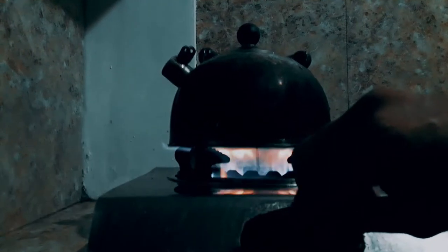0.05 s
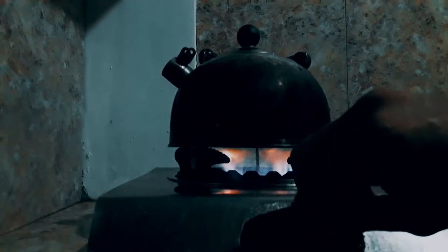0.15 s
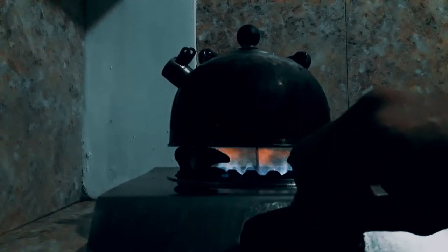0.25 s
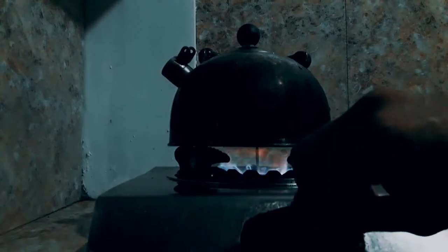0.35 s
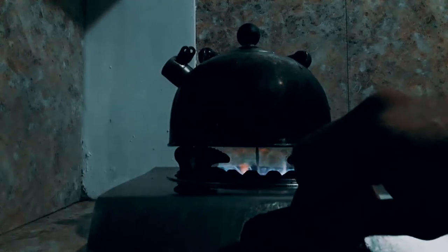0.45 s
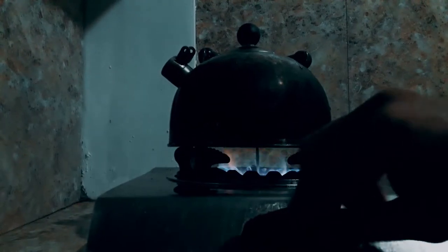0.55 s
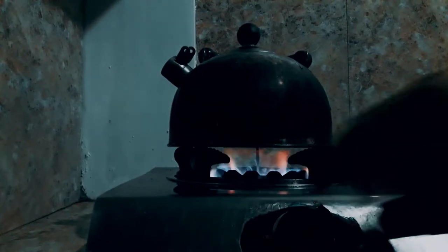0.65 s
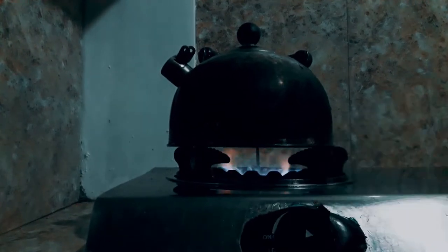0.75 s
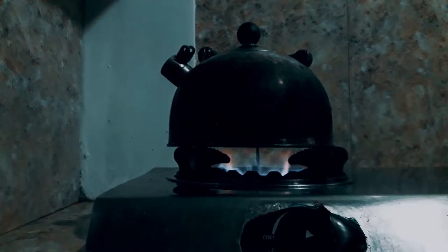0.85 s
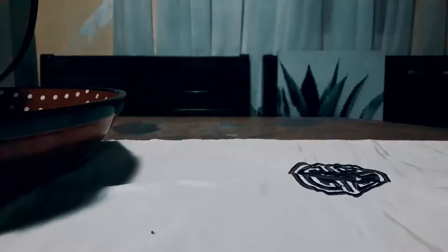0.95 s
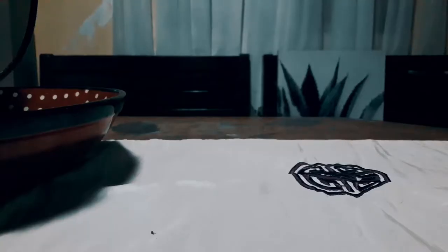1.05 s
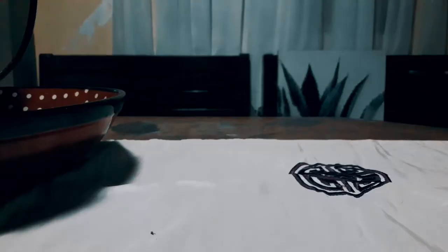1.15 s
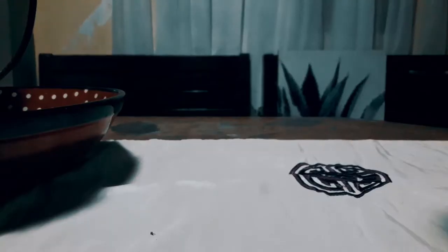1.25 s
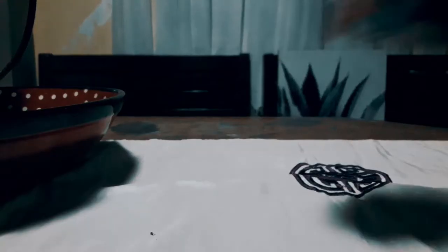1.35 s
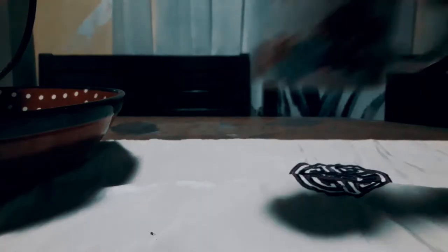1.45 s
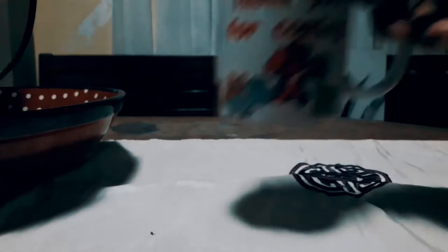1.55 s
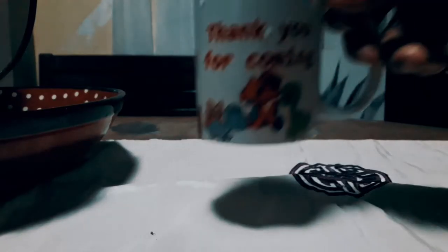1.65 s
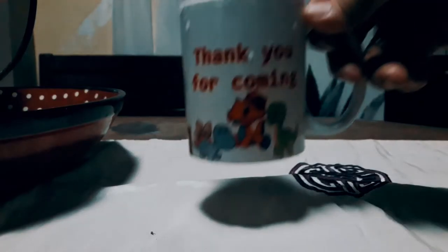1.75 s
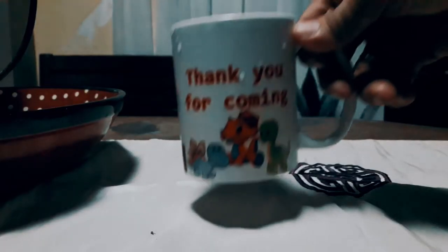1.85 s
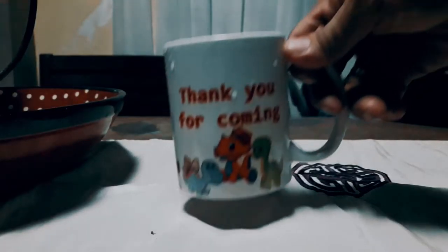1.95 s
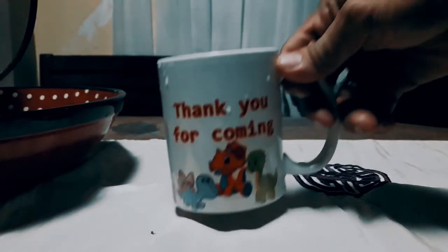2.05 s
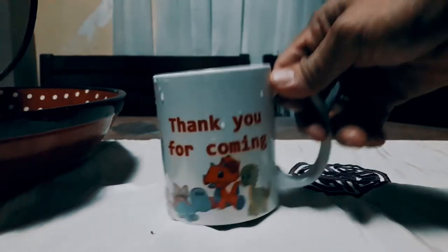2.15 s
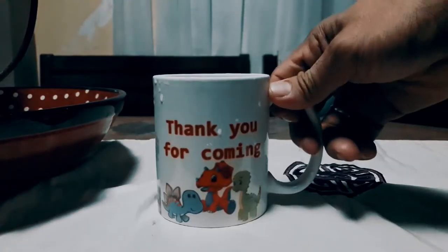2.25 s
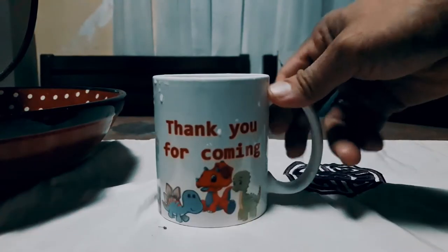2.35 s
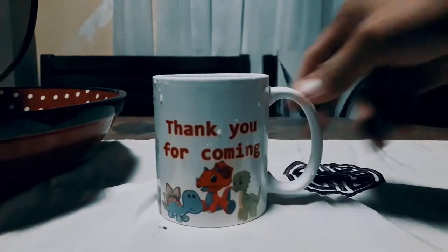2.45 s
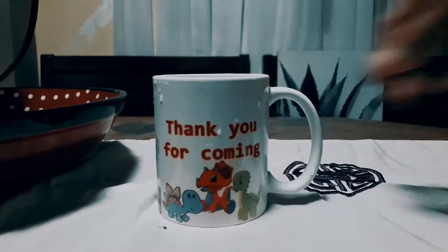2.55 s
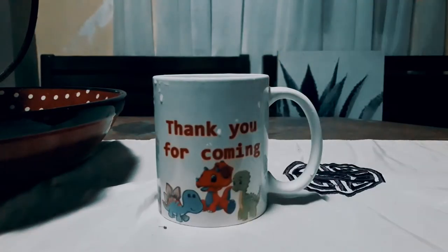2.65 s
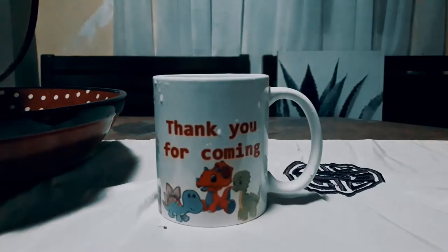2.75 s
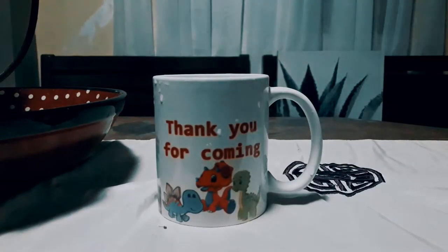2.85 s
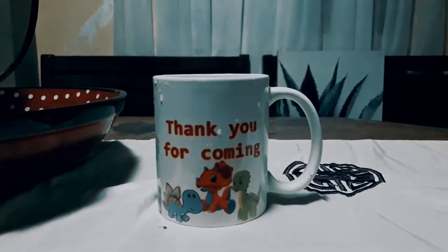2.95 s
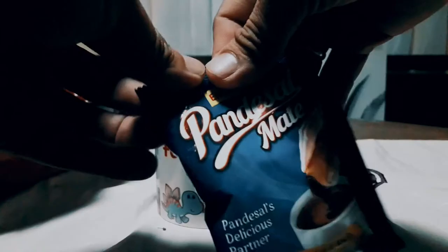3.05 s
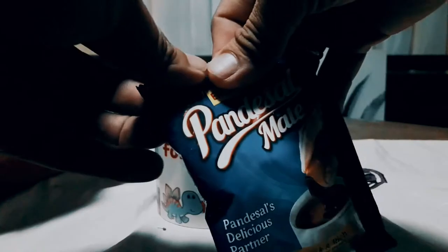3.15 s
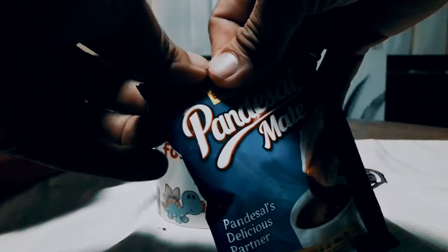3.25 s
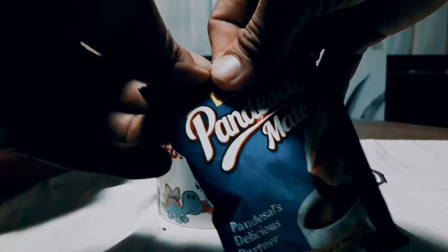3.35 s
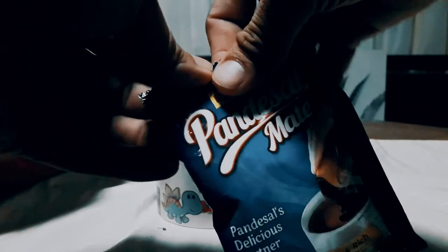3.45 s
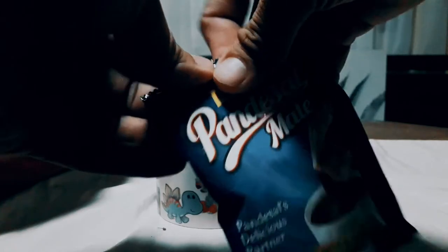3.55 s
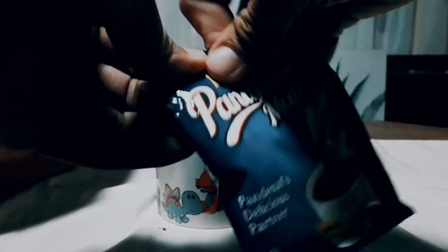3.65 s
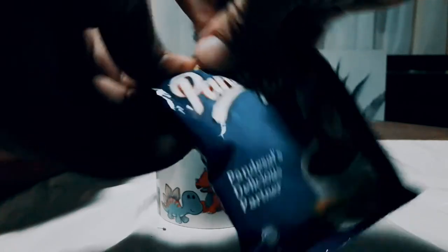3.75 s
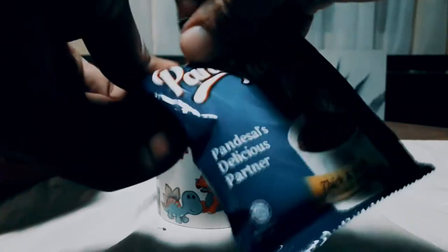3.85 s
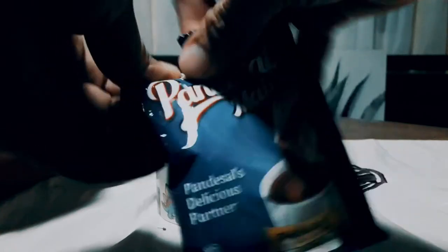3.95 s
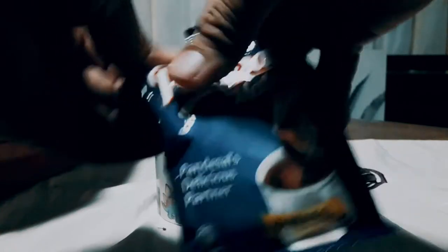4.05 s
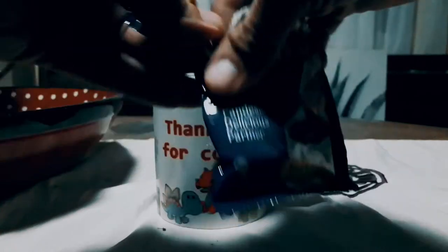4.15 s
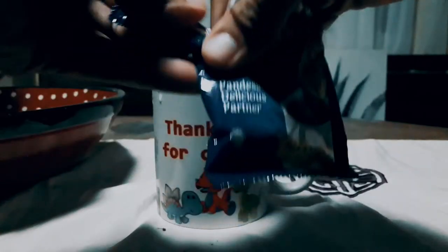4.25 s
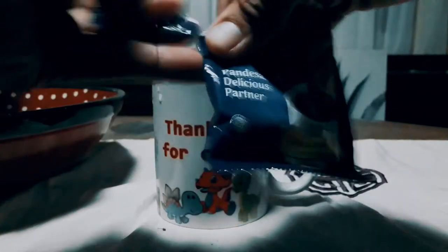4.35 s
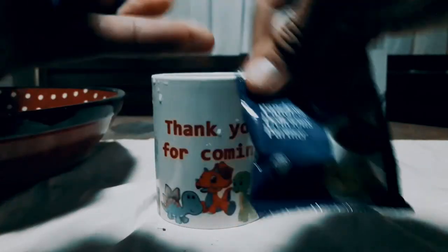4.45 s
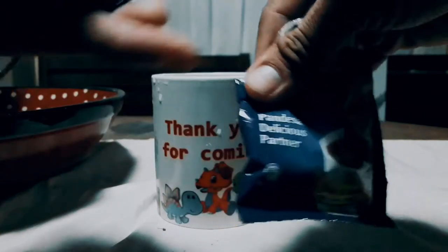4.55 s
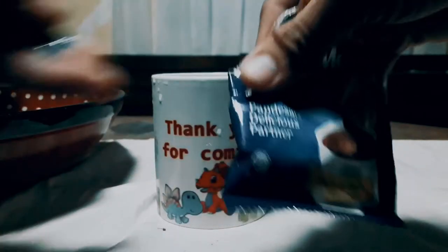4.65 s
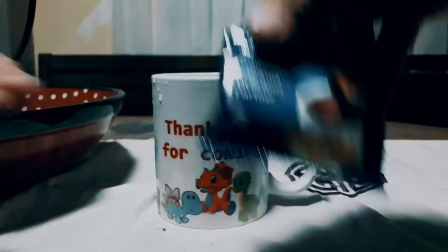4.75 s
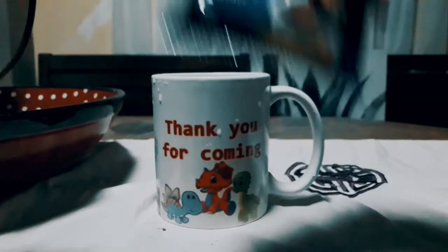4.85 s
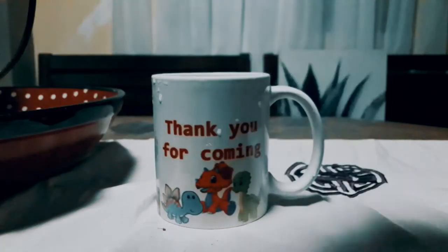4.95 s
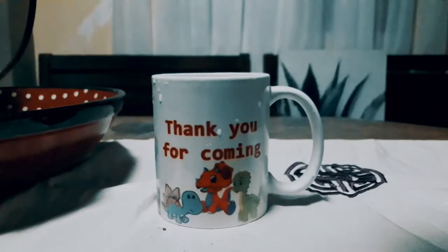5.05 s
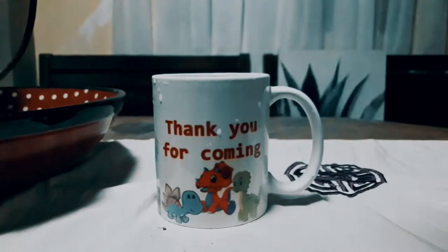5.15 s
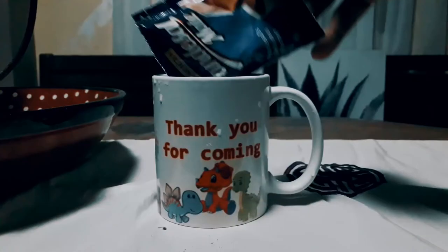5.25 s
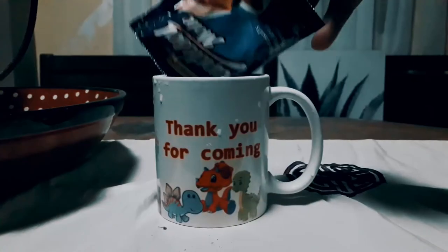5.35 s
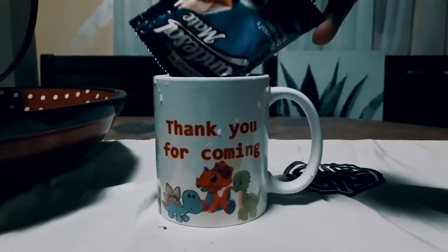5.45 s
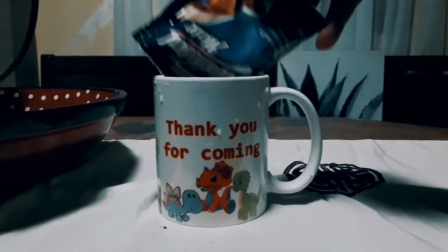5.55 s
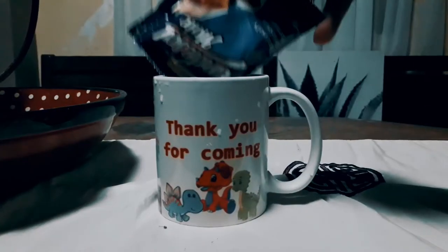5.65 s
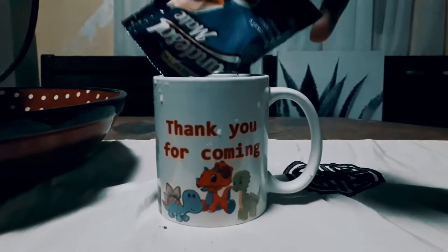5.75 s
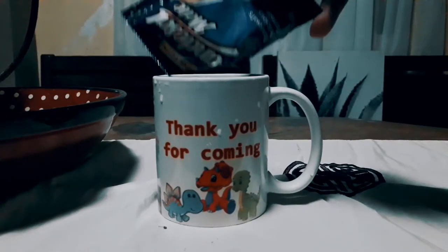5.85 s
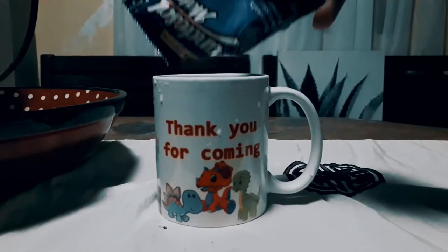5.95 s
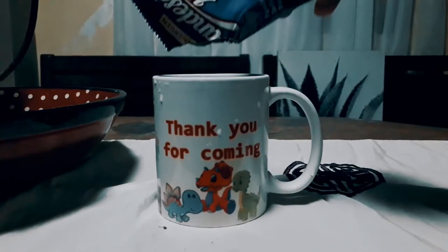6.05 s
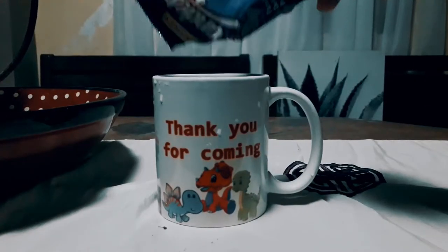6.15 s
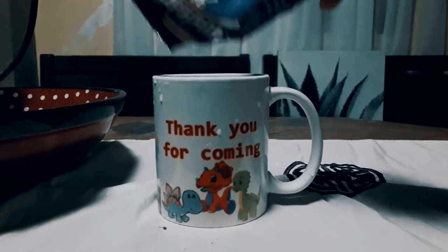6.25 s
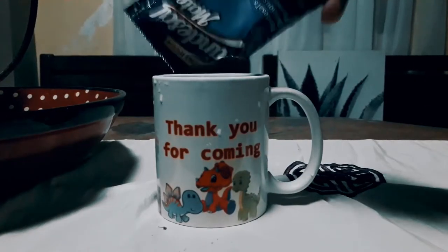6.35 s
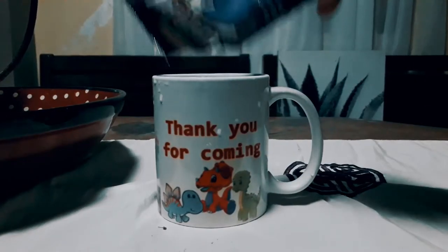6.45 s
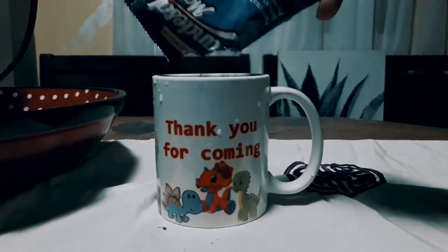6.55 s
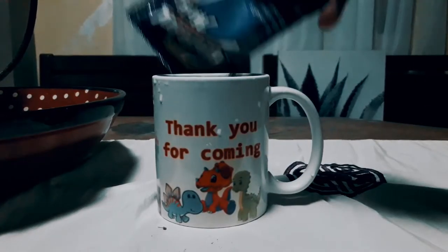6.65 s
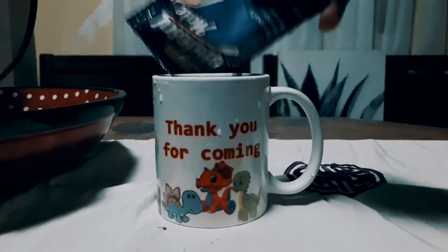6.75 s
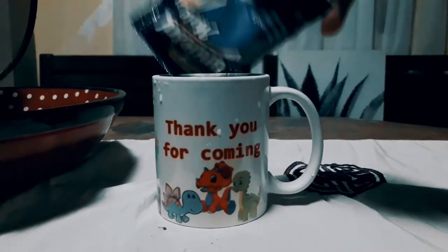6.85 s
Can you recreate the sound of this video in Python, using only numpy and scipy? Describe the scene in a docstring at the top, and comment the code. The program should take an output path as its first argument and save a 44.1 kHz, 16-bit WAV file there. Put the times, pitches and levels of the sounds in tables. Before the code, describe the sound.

Gas hiss and dull stove knocks, a hard cut, a ceramic mug landing on padded wood, then loud sharp sachet crackling fading to faint rustles.

```python
"""A small hard room, close to the microphone: a gas burner hisses while a hand knocks and works its knob.
After a cut, a ceramic mug lands on a cloth-covered wooden table, then a sachet is torn and tipped over it.
Coloured noise makes the jet, flame, cloth and room; decaying sine modes ring stove, table and mug.
The plastic film is sharp noise snaps with a facet ring each, over a crackle of random grains and ticks."""
import sys
import numpy as np
from scipy import signal
from scipy.fft import rfft, irfft, next_fast_len
from scipy.io import wavfile
from scipy.ndimage import uniform_filter1d

SR = 44100
rng = np.random.default_rng(int(sys.argv[2]) if len(sys.argv) > 2 else 0)


def generate_wav(signal):
    """Clip the signal to [-1, 1] and save it as 16-bit WAV at the path in sys.argv[1]."""
    frames = np.transpose(np.atleast_2d(signal))
    scaled = np.clip(frames, -1, 1) * 32767
    pcm = np.round(scaled).astype(np.int16)
    wavfile.write(sys.argv[1], SR, pcm)


N = 303849
TIME = np.arange(N) / SR

# Colour tables shape noise: freq_hz, gain_db. Mode tables hold ringing partials: freq_hz, level_db, t60_s.

# hiss of the gas jet, singing near one pitch: freq_hz, gain_db
JET_COLOUR = [(2800, -20), (4000, -5), (5250, 1.5), (5550, 13.5), (6150, -4.5), (7400, -1), (8300, -22),
              (9900, -17), (11000, -11), (12500, -15), (16000, -13)]
# low rumble of the flame: freq_hz, gain_db
FLAME_COLOUR = [(25, -22), (60, -5), (100, 1.5), (160, -11.5), (380, -22.5), (900, -31), (1300, -38),
                (3000, -40.5), (6000, -64)]
# the jet's thin overtone dies back as the gas is turned down: time_s, level_db
JET_OVERTONE_LEVEL = [(0, -55.5), (.2, -73), (.9, -71.5)]
OVERTONE_COLOUR = [(9000, -60), (10700, -22), (11020, -8), (11350, -28), (13000, -66)]
# the burner's soft falling whistle: time_s, pitch_hz, level_db
BURNER_WHISTLE = [(0, 910, -64), (.12, 872, -64), (.16, 795, -61), (.29, 782, -55.5), (.4, 769, -63),
                  (.53, 747, -94)]
# the hand knocks knob and stove: start_s, boom_db, knock_db
KNOB_KNOCKS = [(0.094, -46.5, -51), (.279, -53, -67), (0.327, -43, -57.5), (.563, -69, -44),
               (0.664, -42, -51), (.699, -40, -44), (.722, -45, -66), (.774, -43.5, -46)]
# ringing of the stove body: freq_hz, level_db, t60_s
STOVE_MODES = [(101.7, 2, 0.38), (129, 8.5, 0.049), (227.5, -2.5, 0.19), (273, -1, 0.27), (367.4, -15, 1)]
# noise of a knock on the stove: freq_hz, gain_db
STOVE_KNOCK_COLOUR = [(200, -19), (420, 1), (600, 4.5), (800, -6.5), (1000, -2.5), (1250, -23), (2500, -23),
                      (7000, -56), (12000, -50)]
SPIT_COLOUR = [(1200, -36), (2000, -19), (3000, -19), (3900, -2), (4900, -1.0), (6300, -9),
               (7500, -11.5), (8800, -34), (12300, -20), (16000, -35)]

# hum and air of the room: freq_hz, gain_db
ROOM_COLOUR = [(25, -28), (60, -17), (120, -1.5), (210, -3), (320, -16.5), (550, -24), (800, -22.5),
               (1200, -31), (2800, -35.5), (4300, -32), (7000, -38), (9000, -44.5), (16000, -37.5)]
# a faint tone hangs in the room: time_s, pitch_hz, level_db
ROOM_TONE = [(1.66, 814, -72), (1.78, 830, -64.5), (2.0, 830, -81)]
REVERB_COLOUR = [(200, 8.5), (900, -15), (2500, -25.5), (4500, 4.0), (7500, -0.5), (10000, -1.0), (16000, 5)]

# cloth brushed by sleeve, hand and the mug's foot: start_s, swish_db (lower part), hiss_db (upper part)
CLOTH_BRUSHES = [(1.207, -62, -56), (1.275, -56, -54), (1.838, -51, -58), (1.952, -56.5, -56),
                 (2.15, -47, -49), (2.2, -64.5, -65), (2.594, -60.5, -49), (2.7, -65, -51.5)]
# noise of the weave: freq_hz, gain_db
CLOTH_COLOUR = [(1000, -16), (3000, -11.5), (3900, -4.5), (4900, -4), (7400, -7.5), (8400, -29),
                (16000, -25)]
# small ticks on the cloth: start_s, peak_db
TICKS = [(1.208, -38.5), (1.955, -36), (2.599, -41)]
# the mug lands and rocks flat: start_s, level_db (over the blow and boom levels)
MUG_LANDING = [(2.1411, 0.5), (2.1590, -3.5), (2.1721, -8.5), (2.1810, -6.5), (2.2290, -3.5)]
# ringing of the table under the mug: freq_hz, level_db, t60_s
TABLE_MODES = [(146, -8, 1), (235.8, -0.5, 0.22), (281.6, 4, 0.36), (330, -0.5, 0.61), (394, 3, .3),
               (454, -6, .22), (496, -2, 0.64), (722, 2.5, 0.31), (779, -14, 0.19), (856, -1.5, .28),
               (984, -9, 0.56), (1000, -14, 0.34), (1290, -18.5, .28)]
# noise of the mug's blow and boom: freq_hz, gain_db
THUD_COLOUR = [(30, -33), (70, -15), (150, 1.5), (400, 2.5), (600, -5), (830, -4.5), (1100, -16),
               (1450, -27), (2200, -27), (4000, -43), (8000, -66)]
CUSHION_COLOUR = [(1200, -0.5), (2400, -19.5), (5000, -18.5)]
# air resonances of the empty mug: freq_hz, level_db, t60_s
MUG_AIR_MODES = [(849, 2.5, 0.024), (1920, -27.5, 0.1), (3260, -7, 0.055), (3686, 9, 0.0069)]

# the two sachet shots, tearing and pouring: start_s, end_s
SACHET_SHOTS = [(2.892, 4.1192), (4.1192, 7)]
# finger movements on the sachet: start_s, length_s, strength_db, body_db and top_db (re strength),
# creasing_share (0-1)
FINGER_RUSTLES = [(2.862, 0.16, -40.5, -14.5, -9.5, 0.03), (3.032, 0.089, -45, -12, -19, 0.33),
                  (3.307, .17, -47.5, -13, -10.5, 0.27), (3.522, 0.15, -35.5, -2, -17, 1),
                  (3.758, 0.047, -32, -3.5, -19.5, 1), (3.927, 0.094, -42.5, -1, -10, 0.73),
                  (4.13, 0.17, -52, -25, 1, 1), (4.334, 0.051, -41.5, -9, -6.5, 0.76),
                  (4.579, 0.061, -51, -16.5, -4.5, 1), (4.701, 0.065, -35.5, -22, -8.5, 0.8),
                  (4.8, 0.13, -43.5, -14, -5, 0.73), (4.948, 0.13, -42.5, -33, -7.5, 0.75),
                  (5.108, 0.04, -35, -17, -11, 0.53), (5.178, 0.035, -52.5, 1.5, -9, 0.1),
                  (5.346, 0.16, -55, -23.5, -11, 0.03), (5.507, 0.035, -46.5, -14, -10, 0.4),
                  (5.583, 0.095, -57.5, -2, -20, 0.57), (6.359, 0.13, -67.5, -14.5, -9.5, 0.13),
                  (6.495, 0.036, -53, -11.5, -9, 0.41), (6.581, 0.037, -55, -9, -8.5, 0.2),
                  (6.69, 0.14, -60, -11, -3.5, 0.34), (6.831, 0.058, -49.5, -13, -9.5, 0.54)]
# single snaps of the buckling film: start_s, level_db, ring_hz, body_db (re level)
SINGLE_SNAPS = [(3.1169, -37, 6300, -14), (3.1369, -37, 4300, -0.5), (3.469, -39.5, 4000, 2.5),
                (3.509, -40.5, 4460, 5.5), (3.6703, -20, 6400, -17.5), (3.6913, -15, 4900, -21),
                (3.7134, -9, 4710, -8.5), (3.7292, -16, 5200, -12), (3.759, -12, 4450, -25.5),
                (3.7766, -24, 5300, -29), (3.7967, -23.5, 4900, -24), (3.805, -21.5, 4080, -10.5),
                (3.83, -29.5, 3800, -28), (3.9238, -18, 4100, -21), (3.9505, -29.5, 4100, -29.5),
                (3.9672, -21.5, 5440, -21), (4.0037, -20, 6150, -16.5), (4.117, -17.5, 4620, 1),
                (4.1466, -25, 5570, -20), (4.278, -23, 4170, -36), (4.3028, -26.5, 5430, -12.5),
                (4.3727, -21, 6100, -13), (4.5843, -37.5, 6260, -30), (4.6788, -34, 7400, -32),
                (4.693, -29, 5260, -40.5), (4.7473, -26, 5540, -27), (4.795, -25, 3150, -10.5),
                (4.8288, -30, 4750, -6.5), (4.861, -19, 4200, -21.5), (4.9181, -20.5, 4900, -41),
                (5.0435, -27, 3200, -26), (5.1214, -23.5, 3970, -16), (5.1491, -28, 3830, -28),
                (5.522, -43.5, 4100, -15), (5.6542, -44, 3312, -7.5), (6.5177, -42, 6100, -16),
                (6.8717, -41.5, 4790, -31)]
# rips as the seam gives way: main_jerk_s, level_db, ring_hz, body_db (re level)
SEAM_RIPS = [(3.5436, -13.5, 5340, -10), (3.6181, -14.5, 5900, -9), (4.103, -13.5, 4440, -11.5)]
# the film squeaks thinly as it slides: time_s, pitch_hz, level_db
FILM_SQUEAK = [(6.66, 10920, -85), (6.71, 11100, -65.5), (6.76, 11250, -61), (6.8, 10800, -88.5)]
# low range of the film: freq_hz, gain_db
BODY_COLOUR = [(60, -28.5), (200, -9.5), (400, -1.5), (800, 6), (1450, 1), (2300, -20.5)]
# main range of the film: freq_hz, gain_db
CRACK_COLOUR = [(1100, -23.5), (1550, -4.5), (2700, -1.5), (3800, -1), (5500, -4.5), (7400, 0),
                (8100, -12.5), (9500, -36)]
# top range of the film: freq_hz, gain_db
TOP_COLOUR = [(6800, -32), (8000, -0.5), (9500, -1.5), (12500, 1), (15500, -4.5), (17000, -11)]

# the stove shot ends, then silence until the table shot begins
CUT_OUT_S, CUT_IN_S = .902, .931
# room hum, before and from the pouring shot
HUM_TEARING_DB, HUM_POURING_DB = -53.5, -61.5
# each finger movement swells over a share of its length, holds and dies away
SWELL_SHARE, RELEASE_T60_S = 0.31, 0.3
# a rip runs in three jerks, the outer two weaker
JERK_GAP_S, OUTER_JERK_DB = 0.0087, -3.5
# a snap's top follows its ring: small, high facets are the brightest
SNAP_TOP_DB, SNAP_TOP_HZ, SNAP_TOP_DB_PER_OCTAVE = -12, 4670, 9.5
# the sheet goes on crackling after each snap
WAKE_DB, WAKE_T60_S = -31, .2
# lesser random snaps: level over the creasing, its spread, and body re level
STRAY_DB, STRAY_SPREAD_DB, STRAY_BODY_DB = 6, 4.5, -19.5
# facets ring lower and stand out more while the sachet's mouth is spread open
FACET_HZ, OPEN_HZ, OPEN_DB, OPEN_S, OPEN_WIDTH_S = 4640, 2180, 9, 5.09, 0.18
OVER_MUG_S = 4.97
TOP_HZ = 16200  # upper limit of the recorder


def undb(db):
    """Decibels to gain."""
    return 10 ** (np.asarray(db) / 20)


def unit(x):
    """Scale to rms 1."""
    return x / np.sqrt(np.mean(x ** 2) + 1e-30)


def curves(rows):
    """Every column after the first, joined by straight lines in time."""
    s, *columns = np.transpose(rows)
    return [np.interp(TIME, s, c) for c in columns]


def during(rows):
    """1 between the first and last row of a table, 0 elsewhere."""
    return (TIME >= rows[0][0]) & (TIME <= rows[-1][0])


def colour(x, points):
    """Causal minimum-phase filter with the given freq_hz, gain_db outline."""
    size = 2 * next_fast_len(len(x) // 2 + 2048)
    hz, db = np.transpose(points)
    bins = np.maximum(np.arange(size // 2 + 1) * SR / size, 1)
    gain = undb(np.interp(np.log(bins), np.log(hz), db))
    # folding the cepstrum forward in time makes the filter causal
    cepstrum = irfft(np.log(gain))
    cepstrum[1:size // 2] *= 2
    cepstrum[size // 2 + 1:] = 0
    return irfft(rfft(x, size) * np.exp(rfft(cepstrum)))[:len(x)]


def noise(points):
    """Steady coloured noise of rms 1."""
    return unit(colour(rng.standard_normal(N), points))


def fade(t60, size):
    """Exponential decay, 60 dB in t60 seconds."""
    return np.exp(-np.log(1000) * TIME[:size] / t60)


def burst(t60, size):
    """Decaying white noise."""
    return rng.standard_normal(size) * fade(t60, size)


def ring(modes, size):
    """Struck modes of alternating sign, each a decaying sine."""
    out = np.zeros(size)
    for k, (hz, db, t60) in enumerate(modes):
        out += (-1) ** k * undb(db) * np.sin(2 * np.pi * hz * TIME[:size]) * fade(t60, size)
    return out


def walk(rate):
    """Smooth random wandering of rms 1, with `rate` new values a second."""
    k = int(SR / rate)
    steps = np.repeat(rng.standard_normal(N // k + 1), k)
    return unit(uniform_filter1d(steps, k)[:N])


def add(out, s, sound):
    """Mix a sound in at time s."""
    i = max(int(s * SR), 0)
    out[i:i + len(sound)] += sound[:max(N - i, 0)]


def tone(rows, waver, flutter_db):
    """A thin, slightly unsteady sine on a pitch and level curve."""
    hz, db = curves(rows)
    phase = 2 * np.pi * np.cumsum(hz * (1 + waver * walk(150))) / SR
    return np.sqrt(2) * np.sin(phase) * undb(db + flutter_db * walk(41.8)) * during(rows)


def burner(jet_db=-62, flame_db=-55):
    """Gas rushing from the jet hisses, sings and whistles while the flame rumbles below."""
    out = noise(JET_COLOUR) * undb(jet_db + 0.53 * walk(5.3))
    out += noise(FLAME_COLOUR) * undb(flame_db + 2 * walk(7.7))
    out += noise(OVERTONE_COLOUR) * undb(curves(JET_OVERTONE_LEVEL)[0])
    return out + tone(BURNER_WHISTLE, waver=0.0061, flutter_db=4.5)


def knob_knocks(knock_t60=0.23):
    """Each knock rings the stove body and adds a decaying noise thump."""
    out, size = np.zeros(N), SR // 2
    for s, boom_db, knock_db in KNOB_KNOCKS:
        knock = unit(colour(rng.standard_normal(size), STOVE_KNOCK_COLOUR)) * fade(knock_t60, size)
        add(out, s, undb(boom_db) * ring(STOVE_MODES, size) + undb(knock_db) * knock)
    return out


def gas_spit(start_s=.392, level_db=-41, t60=0.36):
    """The knob lets out one short spit of gas, a sudden hiss that dies away."""
    out, size = np.zeros(N), SR // 2
    hiss = unit(colour(rng.standard_normal(size), SPIT_COLOUR))
    add(out, start_s, undb(level_db) * hiss * fade(t60, size))
    return out


def room():
    """Gently wavering low hum of the room, with one faint tone hanging in it."""
    hum_db = np.where(TIME < SACHET_SHOTS[1][0], HUM_TEARING_DB, HUM_POURING_DB)
    hum = noise(ROOM_COLOUR) * undb(hum_db + 1.0 * walk(7.6))
    return hum + tone(ROOM_TONE, waver=0.023, flutter_db=3.5)


def brushes(rise_t60=0.15, fall_t60=0.39, catch_db=-6, catch_t60=0.025, patchy_db=2.5):
    """Cloth catches with a small tick, then slides and comes to rest; its weave shifts the colour as it goes."""
    strokes, size = np.zeros((2, N)), SR // 2
    slide = 2 * (1 - fade(rise_t60, size)) * fade(fall_t60, size)
    shape = slide + undb(catch_db) * fade(catch_t60, size)
    for s, swish_db, hiss_db in CLOTH_BRUSHES:
        add(strokes[0], s, undb(swish_db) * shape)
        add(strokes[1], s, undb(hiss_db) * shape)
    weave = noise(CLOTH_COLOUR)
    low = signal.sosfiltfilt(signal.butter(4, 5400, fs=SR, output="sos"), weave)
    swish = strokes[0] * low * undb(patchy_db * walk(24.5))
    hiss = strokes[1] * (weave - low) * undb(patchy_db * walk(27))
    return swish + hiss


def cloth_ticks(tick_t60=.012):
    """Small dry ticks as the cloth catches, each a short noise burst."""
    out = np.zeros(N)
    for s, db in TICKS:
        tick = colour(burst(tick_t60, size=2048), CLOTH_COLOUR)
        add(out, s, undb(db) * tick / np.abs(tick).max())
    return out


def mug(blow_db=-13, blow_t60=0.051, modes_db=-20, boom_db=-19, boom_t60=0.53,
        knock_hz=800, knock_db=-4, knock_t60=0.024, hollow_hz=743, hollow_db=-35, hollow_t60=1.1):
    """The mug's foot thumps through the cloth and rocks flat; the table top and the mug's hollow ring on."""
    out, size = np.zeros(N), SR
    for s, db in MUG_LANDING:
        blow = colour(burst(blow_t60, size), THUD_COLOUR)
        blow = blow / np.sqrt(np.mean(blow[:SR // 100] ** 2))  # level set by the first 10 ms
        boom = unit(colour(rng.standard_normal(size), THUD_COLOUR)) * fade(boom_t60, size)
        add(out, s, undb(db) * (undb(blow_db) * blow + undb(boom_db) * boom))
    # only the first blow carries enough weight to move the whole table
    body = ring([(knock_hz, knock_db, knock_t60), (hollow_hz, hollow_db, hollow_t60)], size)
    add(out, MUG_LANDING[0][0], undb(modes_db) * ring(TABLE_MODES, size) + body)
    # the cloth cushions every contact
    out = colour(out, CUSHION_COLOUR)
    # the fingers leave the handle with a faint ping
    add(out, 2.388, ring([(2147, -59.0, 0.25)], size))
    return out


def opening(s):
    """How far the sachet's mouth is spread, 0-1, peaking once."""
    return np.exp(-((s - OPEN_S) / OPEN_WIDTH_S) ** 2)


def facet_pitch(s):
    """Pitch of the small facets, lowest when the sachet is widest open."""
    return FACET_HZ + (OPEN_HZ - FACET_HZ) * opening(s)


def snap_top(hz):
    """Level of a snap's top range, in dB re its main range."""
    return SNAP_TOP_DB + SNAP_TOP_DB_PER_OCTAVE * np.log2(hz / SNAP_TOP_HZ)


def loud_snaps():
    """Single snaps together with the three jerks of every rip."""
    out = list(SINGLE_SNAPS)
    for s, db, hz, body_db in SEAM_RIPS:
        for k in (-1, 0, 1):
            out.append((s + k * JERK_GAP_S, db + abs(k) * OUTER_JERK_DB, hz, body_db))
    return out


def handling():
    """Strength of the crackle's main range, body, top and creasing: finger movements plus each snap's wake."""
    power, size = np.zeros((4, N)), SR
    for s, length, db, body_db, top_db, creasing in FINGER_RUSTLES:
        swell = np.minimum(TIME[:size] / (SWELL_SHARE * length), 1)
        release = np.exp(-np.log(1000) * np.maximum(TIME[:size] - length, 0) / RELEASE_T60_S)
        shares = (1, undb(body_db), undb(top_db), np.clip(creasing, 0, 1))
        for band, share in zip(power, shares):
            add(band, s, (undb(db) * share * swell * release) ** 2)
    for s, db, hz, body_db in loud_snaps():
        shares = (1, undb(body_db), undb(snap_top(hz)), 1)
        for band, share in zip(power, shares):
            add(band, s, (undb(db + WAKE_DB) * share * fade(WAKE_T60_S, size)) ** 2)
    return np.sqrt(power)


def folds(uneven_db=8):
    """Rubbed film hisses through one fold after another, each with its own resonances, as the grip shifts."""
    out, size = np.zeros(N), 4096
    bands = np.geomspace(CRACK_COLOUR[0][0], CRACK_COLOUR[-1][0], 40)
    film = np.interp(bands, *np.transpose(CRACK_COLOUR))
    turn = np.sin(np.pi * np.arange(size) / size)
    half_s = size / SR / 2  # neighbouring folds overlap by half
    for s in np.arange(SACHET_SHOTS[0][0] - half_s, N / SR, half_s):
        outline = np.c_[bands, film + uneven_db * rng.standard_normal(len(bands))]
        fold = colour(rng.standard_normal(size), outline)
        add(out, s, unit(fold) * turn)
    return out


def thinned(hiss, firm, edge_hz=2900, light_db=-9, lift_db=2):
    """Under a light touch only small folds sound, so the hiss moves from its lower part to its upper."""
    low = signal.sosfiltfilt(signal.butter(4, edge_hz, fs=SR, output="sos"), hiss)
    light = 1 - np.clip(firm, 0, 1)
    return (hiss - low) * undb(lift_db * light) + low * undb(light_db * light)


def facets(octaves=.3, drift=0.13, cycles=28, spread_db=6.5):
    """Small facets of film tick and ring briefly, each at its own pitch; pitches drift as the sheet bends."""
    count, size = 3000, 768
    at = rng.integers(0, N, count)
    shift = octaves * rng.standard_normal(count) + drift * walk(14)[at]
    hz = facet_pitch(at / SR) * 2 ** shift
    hz = np.where(hz > 7600, hz / 2, hz)[:, None]  # too-high facets drop an octave
    strength = undb(spread_db * np.minimum(rng.exponential(size=count), 4))[:, None]
    # the ring lasts a set number of cycles, so high facets are shorter
    ticks = strength * np.sin(2 * np.pi * hz * TIME[:size]) * fade(cycles / hz, size)
    places = at[:, None] + np.arange(size)
    out = np.bincount(places.ravel(), ticks.ravel(), N)[:N]
    # even out the running level
    return out / np.sqrt(np.abs(uniform_filter1d(out ** 2, size=2000)) + 1e-4)


def crinkle(strength, body, top, creasing, per_s=700, spread_db=3.0, rub_db=-8, grain_t60=0.0086,
            crack_db=-5, facet_db=-7, body_db=-3, top_db=-4.0):
    """Countless tiny creases of very unequal size, over the hiss of film and powder sliding."""
    sizes = undb(spread_db * np.minimum(rng.exponential(size=N), 5))
    power = (rng.random(N) < per_s / SR) * sizes ** 2
    power = np.abs(signal.fftconvolve(power, fade(grain_t60, size=512) ** 2)[:N])
    # the hand's effort sets the mean strength; the creases only share it out
    power = power / (uniform_filter1d(power, size=1500) + 1e-6)
    grains = unit(np.sqrt(np.abs(power) + undb(rub_db) ** 2))
    # a light touch only slides film and powder; a firm one creases the sheet
    firm = creasing / (strength + 1e-9)
    grains = 1 + np.sqrt(firm) * (grains - 1)
    crack = undb(crack_db) * grains * thinned(folds(), firm)
    crack = crack + undb(facet_db + OPEN_DB * opening(TIME)) * firm * facets()
    low = body * undb(body_db) * noise(BODY_COLOUR)
    high = top * undb(top_db) * noise(TOP_COLOUR)
    return strength * crack + grains * (low + high)


def stray_snaps(creasing, count=90, octaves=.25):
    """Lesser snaps at random moments, as strong as the creasing allows."""
    at = np.linspace(SACHET_SHOTS[0][0] * SR, N, count, endpoint=False)
    at = (at + rng.random(count) * (at[1] - at[0])).astype(int)
    loud, high = rng.standard_normal((count, 2)).T
    db = 20 * np.log10(creasing[at] + 1e-9) + STRAY_DB + STRAY_SPREAD_DB * loud
    hz = facet_pitch(at / SR) * 2 ** (octaves * high)
    audible = db > -58
    rows = np.c_[at / SR, db, hz][audible]
    return [(s, level, pitch, STRAY_BODY_DB) for s, level, pitch in rows]


def snaps(rows, crack_t60=0.0068, body_t60=0.013, top_t60=.0065, ring_db=7, ring_width=0.2,
          flap_db=-24, flap_t60=0.14, slope_db=2, uneven_db=3.0, creak_db=-14, creak_t60=0.013):
    """Each crease creaks, flips abruptly, rings its own facet of film and leaves the sheet shivering."""
    out, size, lead = np.zeros(N), 2048, 400  # samples of flip and of creak before it
    window = int(.0036 * SR)  # the flip's level is its rms over this first stretch
    bands = np.geomspace(1000, 10000, 48)
    crack_hz, crack_gain_db = np.transpose(CRACK_COLOUR)
    film = np.interp(np.log(bands), np.log(crack_hz), crack_gain_db)
    for s, level_db, hz, body_db in rows:
        peak = ring_db * np.exp(-.5 * (np.log(bands / hz) / ring_width) ** 2)
        facet = film + peak - slope_db * np.abs(np.log2(bands / hz))
        # every fold has its own uneven set of partials
        facet = facet + uneven_db * uniform_filter1d(rng.standard_normal(len(bands)), size=2)
        ranges = [(np.c_[bands, facet], crack_t60, 0), (BODY_COLOUR, body_t60, body_db),
                  (TOP_COLOUR, top_t60, snap_top(hz))]
        for points, t60, share_db in ranges:
            creak = undb(creak_db) * burst(creak_t60, lead)[::-1]
            flap = burst(t60, size) + undb(flap_db) * burst(flap_t60, size)
            flip = colour(np.r_[creak, flap], points)
            flip_rms = np.sqrt(np.mean(flip[lead:lead + window] ** 2))
            add(out, s - lead / SR, flip * undb(level_db + share_db) / flip_rms)
    return out


def reverb(x, wet_db=-20, t60=0.44):
    """Diffuse tail of the small room: slow-rising decaying noise, weakest in the low treble."""
    size = SR // 2
    tail = colour(burst(t60, size) * (1 - fade(0.083, size)), REVERB_COLOUR)
    return undb(wet_db) * signal.fftconvolve(x, tail / np.sqrt(np.sum(tail ** 2)))[:N]


def cavity(x, db=-39):
    """Held over the rim, the sachet sets the air in the mug ringing."""
    return undb(db) * signal.fftconvolve(x * (TIME > OVER_MUG_S), ring(MUG_AIR_MODES, size=SR // 4))[:N]


def sachet():
    """Film snaps and crackles in two shots, tearing then pouring; the cut chops the last rip short."""
    strength, body, top, creasing = handling()
    crackle = crinkle(strength, body, top, creasing)
    crackle = crackle + tone(FILM_SQUEAK, waver=0.0015, flutter_db=2)
    creases = loud_snaps() + stray_snaps(creasing)
    out = np.zeros(N)
    for start_s, end_s in SACHET_SHOTS:
        shot = (TIME >= start_s) & (TIME < end_s)
        film = snaps([row for row in creases if start_s < row[0] < end_s]) + crackle * shot
        film = film + cavity(film)
        out += (film + reverb(film)) * shot
    return out


def scene():
    """The stove, a brief silence at the cut, then the table."""
    stove = burner() + knob_knocks() + gas_spit()
    table = room() + brushes() + cloth_ticks() + mug() + sachet()
    return (stove * (TIME < CUT_OUT_S) + table * (TIME > CUT_IN_S))[None]


def record(dry):
    """The deepest bass is filtered away; loud peaks are held below full scale and the recorder cuts the top."""
    dry = signal.sosfilt(signal.butter(2, 42, "high", fs=SR, output="sos"), dry)
    clipped = np.clip(dry, -.8, .8)
    return signal.sosfilt(signal.ellip(10, .2, 80, TOP_HZ, fs=SR, output="sos"), clipped)


dry = scene()
out = record(dry)
generate_wav(out)
```